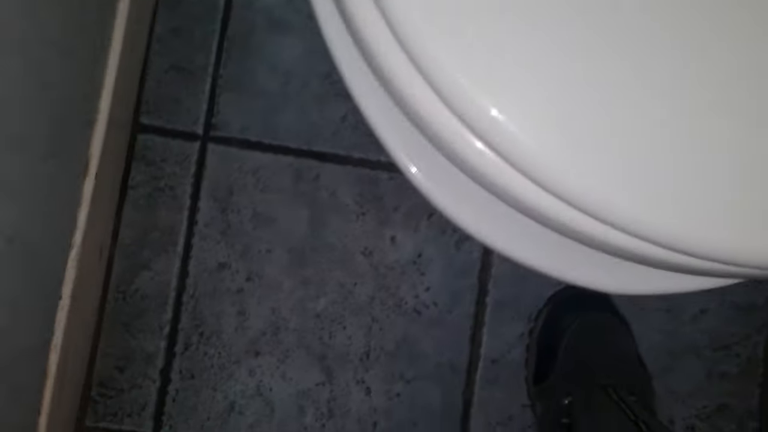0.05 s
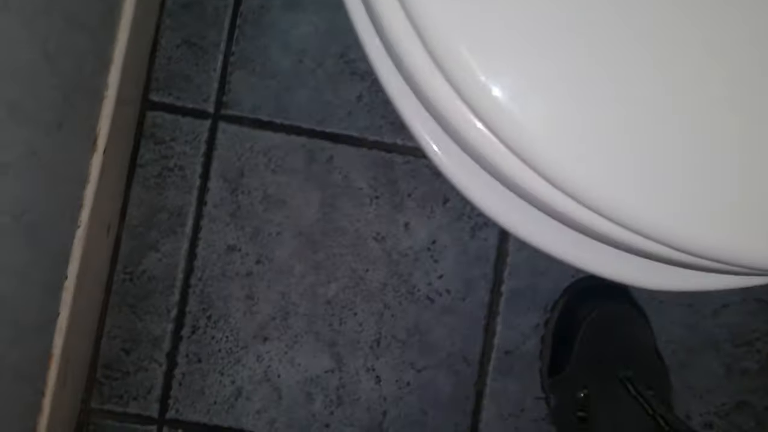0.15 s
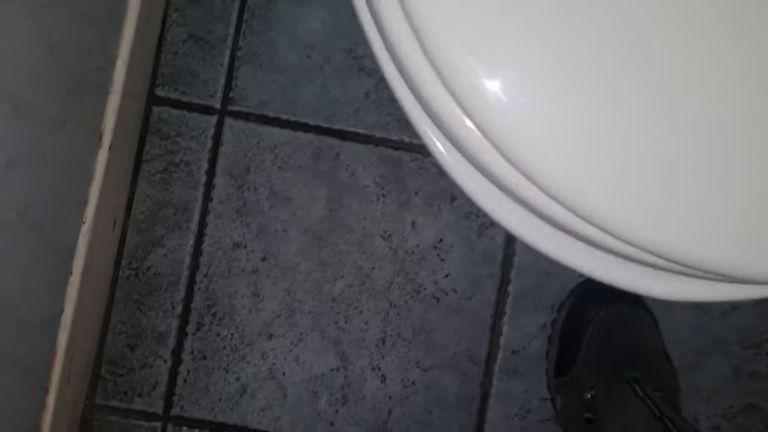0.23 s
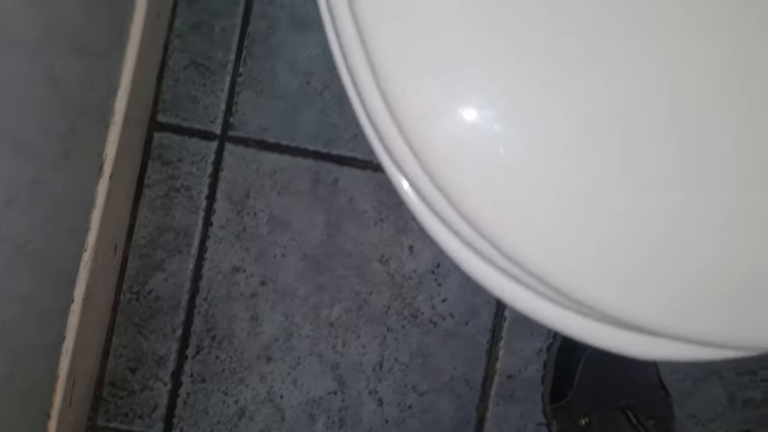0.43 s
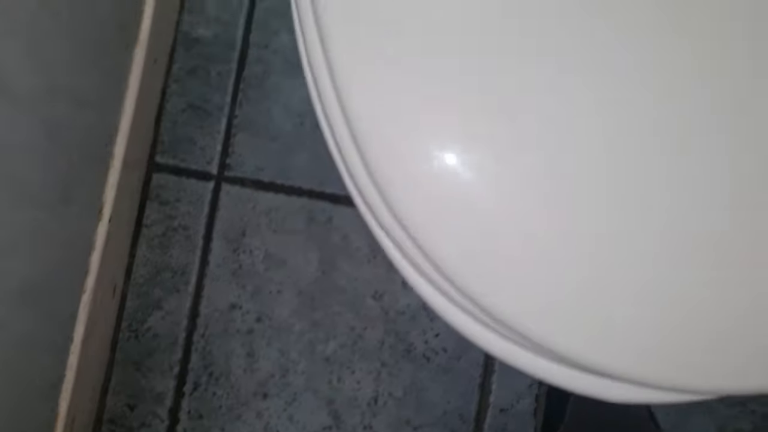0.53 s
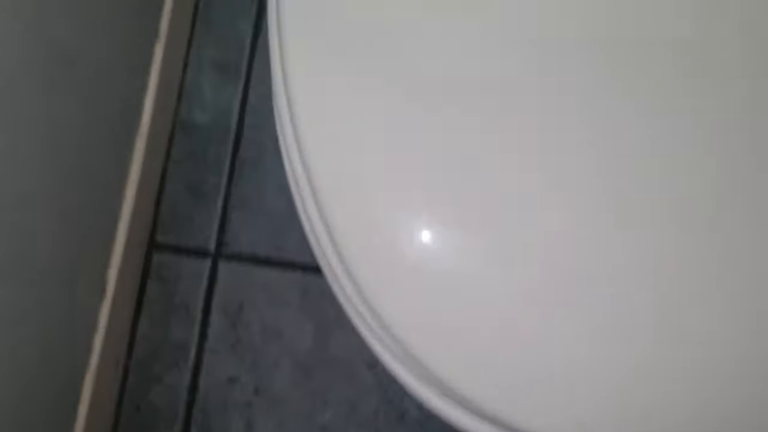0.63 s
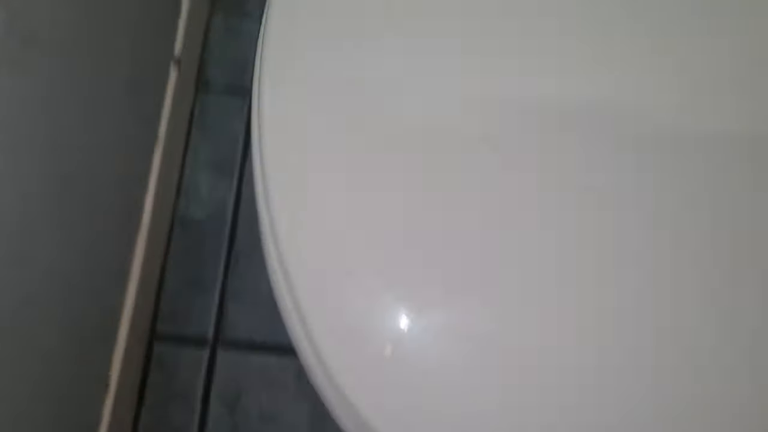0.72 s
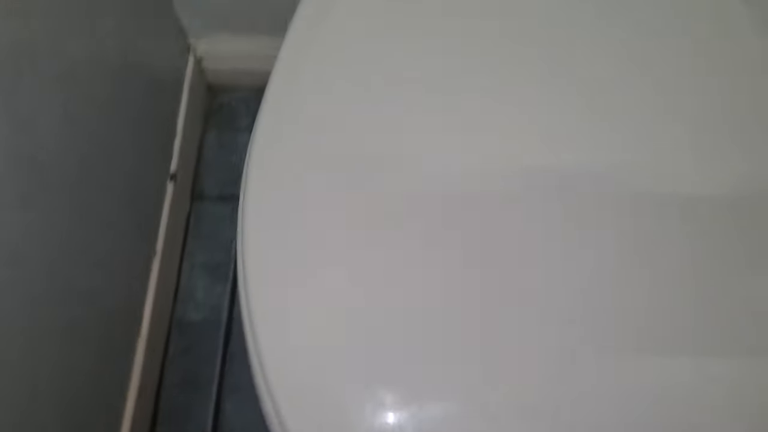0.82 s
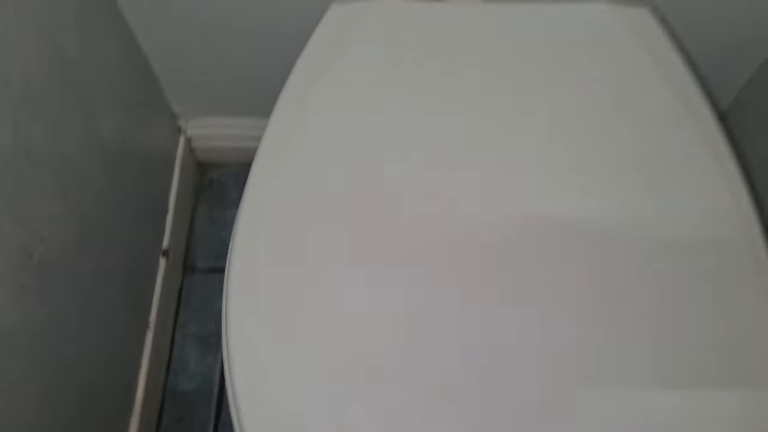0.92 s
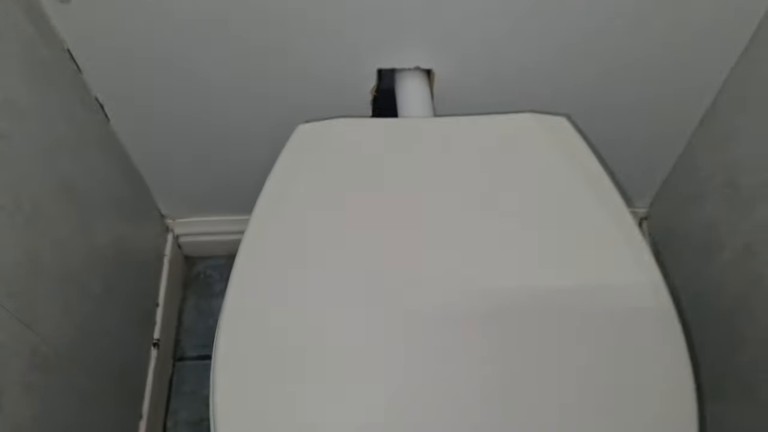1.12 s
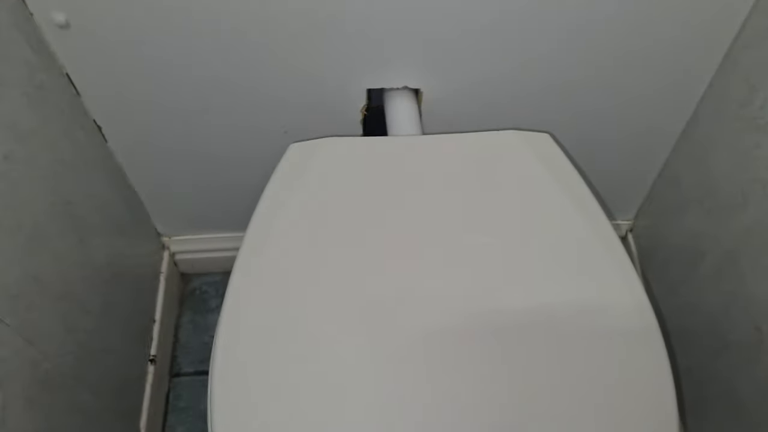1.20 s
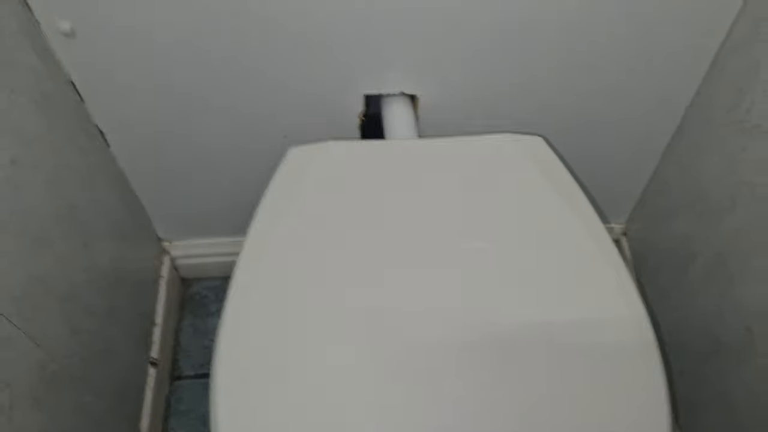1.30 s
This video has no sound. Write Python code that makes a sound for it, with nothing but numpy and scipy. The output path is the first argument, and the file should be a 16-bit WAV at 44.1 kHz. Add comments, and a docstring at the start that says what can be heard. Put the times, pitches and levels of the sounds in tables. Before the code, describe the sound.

A toilet seat and lid drop shut with a heavy thud in a small tiled cubicle.

```python
"""A small tiled cubicle: a plastic toilet seat drops onto the bowl and its lid slaps shut just after.
Lid, seat and bowl crack, thud and ring briefly, the walls throw back a short boom, and the closing
lid pushes out a puff of air. Clothes rustle as an arm moves and the hand-held microphone is nudged,
over a low background rumble."""
import sys
import numpy as np
from scipy import signal
from scipy.fft import rfft, irfft
from scipy.io import wavfile
from scipy.ndimage import uniform_filter1d

SR = 44100
rng = np.random.default_rng(int(sys.argv[2]) if len(sys.argv) > 2 else 0)


def generate_wav(signal):
    """Clip the signal to [-1, 1] and save it as 16-bit WAV at the path in sys.argv[1]."""
    frames = np.transpose(np.atleast_2d(signal))
    scaled = np.clip(frames, -1, 1) * 32767
    pcm = np.round(scaled).astype(np.int16)
    wavfile.write(sys.argv[1], SR, pcm)


N = 59535


def amp(db):
    """Decibels to gain."""
    return 10 ** (np.asarray(db) / 20)


def unit_rms(x):
    """Scales to rms 1."""
    return x / np.sqrt(np.mean(x ** 2) + 1e-20)


def curve_at(points, hz):
    """Reads a curve on a log-frequency axis."""
    f, value = np.transpose(points)
    return np.interp(np.log(hz + 1), np.log(f), value)


def pan(db):
    """Left and right gains; positive dB leans left."""
    return amp(np.array([[.5], [-.5]]) * db)


def add(mix, s, sound):
    """Mixes a sound in at s seconds."""
    part = mix[:, max(round(s * SR), 0):][:, :sound.shape[-1]]
    part += sound[..., :part.shape[1]]


def colour_hits(hits, eq, size=4096):
    """Turns each impulse into a minimum-phase click of unit energy, shaped by the EQ."""
    log_gain = np.log(amp(curve_at(eq, abs(np.fft.fftfreq(size, 1 / SR)))))
    click = np.fft.ifft(np.exp(np.conj(signal.hilbert(log_gain)))).real[:size // 2]
    click /= np.linalg.norm(click)
    return signal.fftconvolve(hits, click[None], axes=1)[:, :N]


def noise_bed(eq, balance, correlation, flicker_db):
    """Stereo noise at rms 1, shaped and panned by frequency, flickering in small patches."""
    hz = np.fft.rfftfreq(N, 1 / SR)
    left, other = rfft(rng.standard_normal((2, N)))
    alike = curve_at(correlation, hz) if correlation else 0
    right = alike * left + np.sqrt(1 - alike ** 2) * other
    spectrum = np.array([left, right]) * amp(curve_at(eq, hz)) * pan(curve_at(balance, hz))
    bands = signal.stft(irfft(spectrum, N), nperseg=512)[2]
    patches = uniform_filter1d(rng.standard_normal(bands.shape), size=12, axis=1)  # across frequency
    patches = unit_rms(uniform_filter1d(patches, size=6, axis=2))  # across time
    return unit_rms(signal.istft(bands * amp(flicker_db * patches))[1][:, :N])


def noise_burst(s, db, centre_hz, octaves, width_s=0.0068):
    """A brief swell of band-limited noise, peaking at s seconds."""
    t, hz = np.arange(N) / SR, np.fft.rfftfreq(N, 1 / SR)
    band = np.exp(-.5 * (np.log2((hz + 1) / centre_hz) / octaves) ** 2)
    hiss = unit_rms(irfft(rfft(rng.standard_normal((2, N))) * band, N))
    return amp(db) * np.exp(-.5 * ((t - s) / width_s) ** 2) * hiss


# tone of the rumble (frequency [Hz], relative level [dB])
RUMBLE_EQ = [(20, -28), (35, -4), (52, 1), (70, -3.5), (112, -21), (160, 1), (179, -15), (202, 6),
             (228, -19), (303, -3.5), (345, -14.5), (700, -22.5), (1600, -27.5), (2200, -33), (2750, -54),
             (5600, -35.5), (8000, -42.5), (16000, -49.5)]
# its stereo balance (frequency [Hz], left over right [dB])
RUMBLE_BALANCE = [(40, -2.5), (160, -0.5), (300, -3.5), (600, -4.5), (1500, -2.5), (4000, -15.5),
                  (10000, 5)]
# its width: near mono lows, wide highs (frequency [Hz], left-right correlation [0-1])
RUMBLE_CORRELATION = [(30, 0.97), (200, 0.96), (300, 0.61), (600, 0.33), (1500, 0), (4000, 0), (16000, 0)]
# its swells (time [s], relative level [dB])
RUMBLE_SWELLS = [(0, 2), (.07, -3), (.2, 3.5), (.37, -1), (.66, -0.5), (.72, -2), (.81, 2), (.93, -1),
                 (1.02, 4.5), (1.16, -1), (1.23, 2), (1.35, -1.5)]


def rumble(level_db=-48):
    """Gently swelling background rumble, coloured by the cubicle's low resonances."""
    swell_db = np.interp(np.arange(N) / SR, *np.transpose(RUMBLE_SWELLS))
    bed = noise_bed(RUMBLE_EQ, RUMBLE_BALANCE, RUMBLE_CORRELATION, flicker_db=2.17)
    return amp(level_db + swell_db) * bed


# tone of sliding cloth (frequency [Hz], relative level [dB])
CLOTH_EQ = [(200, 9.5), (1000, 2), (2000, 3.5), (2800, 2.5), (4000, 2.5), (6600, -2), (8000, -10),
            (12000, -5), (16000, -9.5)]
# its stereo balance (frequency [Hz], left over right [dB])
CLOTH_BALANCE = [(500, -5.5), (5000, -1), (7000, -12.5), (8500, 1.5), (12000, -1.5), (16000, -6.5)]
# the rustle rising and falling with the arm (time [s], level [dB])
ARM_ENVELOPE = [(0, -54.5), (.1, -57), (.23, -57.5), (.37, -64), (.48, -60.5), (.58, -61.5), (.7, -56),
                (.78, -53), (.86, -54), (.92, -60), (.99, -61), (1.02, -59.5), (1.06, -63.5), (1.17, -70),
                (1.35, -70.5)]


def clothes():
    """Cloth slides with the arm: a grainy hiss."""
    grain_db = 0.5 * unit_rms(uniform_filter1d(rng.standard_normal(N), size=60))
    arm_db = np.interp(np.arange(N) / SR, *np.transpose(ARM_ENVELOPE))
    return noise_bed(CLOTH_EQ, CLOTH_BALANCE, correlation=None, flicker_db=1.5) * amp(arm_db + grain_db)


# scuffs, squeaks and the seat's landing tick (time [s], level [dB], centre [Hz], width [octaves])
BURSTS = [(0.023, -53, 1170, 0.051), (0.089, -59.5, 2200, .05), (.1, -63, 6130, 0.087),
          (.17, -69, 6100, .1), (0.423, -60.5, 10700, .4), (0.576, -55, 1217, 0.028),
          (0.758, -55, 3720, 0.29), (.8, -59.5, 11920, 0.33), (1.019, -64.5, 6360, 0.98)]
SEAT_TICK = BURSTS[4]  # played with the plastic cracks


def scuffs():
    """Short scuffs and faint squeaks of cloth and plastic, before and after the slam."""
    return sum(noise_burst(*burst) for burst in BURSTS if burst != SEAT_TICK)


# handling bumps (time [s], level [dB], left over right [dB], starting pitch [Hz], attack [s])
MIC_BUMPS = [(.002, -31, -7, 71, 0.002), (.220, -26.5, -15.5, 179, 0.0026), (0.31, -31, -18.5, 175, 0.0014),
             (0.542, -28, 4, 60, 0.0058), (0.629, -27, 0, 69, 0.01), (0.846, -33.5, 9, 68, 0.004),
             (0.998, -37, -22, 81, 0.0047)]


def mic_bumps(end_hz=52.7, sag_s=0.0052, t60_s=0.089):
    """Soft knocks on the microphone's body, sinking quickly in pitch."""
    t, out = np.arange(SR // 4) / SR, np.zeros((2, N))
    for s, db, pan_db, start_hz, attack_s in MIC_BUMPS:
        hz = end_hz + (start_hz - end_hz) * np.exp(-t / sag_s)
        envelope = (1 - np.exp(-t / attack_s)) * amp(-60 * t / t60_s)
        add(out, s, -amp(db) * pan(pan_db) * envelope * np.sin(2 * np.pi * np.cumsum(hz) / SR))
    return out


# reverb time of the cubicle, longest in the lows (frequency [Hz], 60 dB decay [s])
CUBICLE_DECAY = [(60, 0.45), (250, 0.57), (700, 0.17), (1500, 0.15), (3000, 0.13), (7000, 0.16),
                 (15000, 0.22)]


def cubicle_reverb(correlation, build_s=0.00061):
    """Dense reflections from close tiled walls, each band dying at its own speed."""
    left, other = rng.standard_normal((2, SR // 2))
    right = correlation * left + np.sqrt(1 - correlation ** 2) * other
    hz, t, bands = signal.stft(np.array([left, right]), SR, nperseg=256)
    tail = signal.istft(bands * amp(-60 * t / curve_at(CUBICLE_DECAY, hz)[:, None]))[1]
    tail *= 1 - np.exp(-np.arange(tail.shape[1]) / SR / build_s)
    return tail / np.linalg.norm(tail[0])


def air_puff(start_s=0.433, hz=61.4, attack_s=0.0093, level_db=-20.5, pan_db=-8):
    """Air squeezed from under the lid: a few slow swings of pressure."""
    t, out = np.arange(SR // 4) / SR, np.zeros((2, N))
    envelope = (t / attack_s * np.exp(1 - t / attack_s)) ** 2
    add(out, start_s, -amp(level_db) * pan(pan_db) * envelope * np.sin(2 * np.pi * hz * t))
    return out


# ring of seat on bowl (pitch [Hz], level [dB], 60 dB decay [s], right gain [x, negative across a node])
SEAT_RING = [(100.8, -33.5, 0.3, 2), (200.2, -26, 0.485, 0.43), (210.6, -23.5, 0.27, 0.5),
             (251, -25.5, 0.34, 1.5), (387, -32.5, 0.38, 0.79), (400, -46, 0.076, -7),
             (466.4, -42, 0.13, 4), (509, -31, 0.16, 1.5), (661, -38, 0.26, 3.5), (688.5, -32.5, 0.21, 2.8),
             (1480, -41.5, 0.26, -0.7)]
# ring of lid on seat (pitch [Hz], level [dB], 60 dB decay [s], right gain [x])
LID_RING = [(63.24, -38, 0.51, 2), (126, -30.5, 0.24, 0.5), (181, -30, 0.16, 2.3), (208, -24, 0.11, -0.86),
            (257.8, -29, 0.14, 1.5), (303, -17.5, 0.1, 0.24), (665, -49, 0.21, 0.3), (717, -34.5, 0.1, .9),
            (1004, -31.5, 0.088, -3), (1060, -47, 0.041, 6.2), (1574, -42, 0.12, 3),
            (1578, -33.5, 0.15, -1.25), (2710, -38, 0.068, 0.7), (2800, -58, 0.089, -4.3)]


def seat_and_lid_ring(seat_s=0.4093, lid_s=0.4332):
    """Each landing sets modes ringing: dying sines, with their own strength left and right."""
    t, out = np.arange(SR) / SR, np.zeros((2, N))
    for s, modes in (seat_s, SEAT_RING), (lid_s, LID_RING):
        for hz, db, t60_s, right_gain in modes:
            mode = amp(db - 60 * t / t60_s) * np.sin(2 * np.pi * hz * t)
            add(out, s, np.array([mode, right_gain * mode]))
    return out


# bright snap of hard plastic (frequency [Hz], relative level [dB])
CRACK_EQ = [(100, -22.5), (600, 6), (1050, 1.5), (1300, -3), (1620, 4.5), (2000, -1.5), (2800, -3),
            (4200, -11.5), (6300, -20), (8000, -31), (15000, -45)]
# contacts as seat and lid land and chatter (time [s], relative level [dB])
CRACK_HITS = [(0.4097, -18), (0.4163, -6), (0.4234, -8.5), (0.4338, -8), (0.4359, -3.5), (0.447, -24)]


def plastic_cracks(direct_db=-13, reverb_db=-1.5):
    """The bite of the slam: plastic slaps and chatters, heard mostly off the tiles."""
    hits = np.zeros((2, N))
    for s, db in CRACK_HITS:
        add(hits, s, amp(direct_db + db) * np.ones(1))
        add(hits, s, amp(reverb_db + db) * cubicle_reverb(correlation=-0.26))
    tick = noise_burst(*SEAT_TICK)  # bright high tick of plastic as the seat lands
    return colour_hits(hits, CRACK_EQ) + tick


# dull body of a landing (frequency [Hz], relative level [dB])
THUD_EQ = [(30, -29), (90, 2), (210, 2.5), (330, -4), (430, -6.5), (520, -21.5), (600, -16.5), (740, 0.5),
           (890, -25), (1100, -16), (1300, -39), (2500, -49), (16000, -111)]
# heavy contacts of seat and lid (time [s], direct level [dB], reverb level [dB])
THUD_HITS = [(0.4091, -6, -12.5), (0.4177, 2.5, -8.5), (0.4335, -0.5, -4)]


def landing_thuds():
    """The weight of the slam: seat and lid thud down and the cubicle booms."""
    hits = np.zeros((2, N))
    for s, direct_db, reverb_db in THUD_HITS:
        add(hits, s, amp(direct_db) * np.ones(1))
        add(hits, s, amp(reverb_db) * cubicle_reverb(correlation=0.52))
    return colour_hits(hits, THUD_EQ)


def scene():
    """The slam of seat and lid, over the handling noise and the background."""
    slam = landing_thuds() + plastic_cracks() + seat_and_lid_ring() + air_puff()
    return slam + mic_bumps() + clothes() + scuffs() + rumble()


def record(dry):
    """A low cut trims the sub-bass and a steep high cut takes off the very top."""
    low_cut_hz, high_cut_hz = 32.7, 15800
    low_cut = signal.butter(4, low_cut_hz, "high", fs=SR, output="sos")
    high_cut = signal.firwin(1023, high_cut_hz, window=("kaiser", 9), fs=SR)
    return signal.oaconvolve(signal.sosfilt(low_cut, dry), high_cut[None], "same")


dry = scene()
out = record(dry)
generate_wav(out)
```